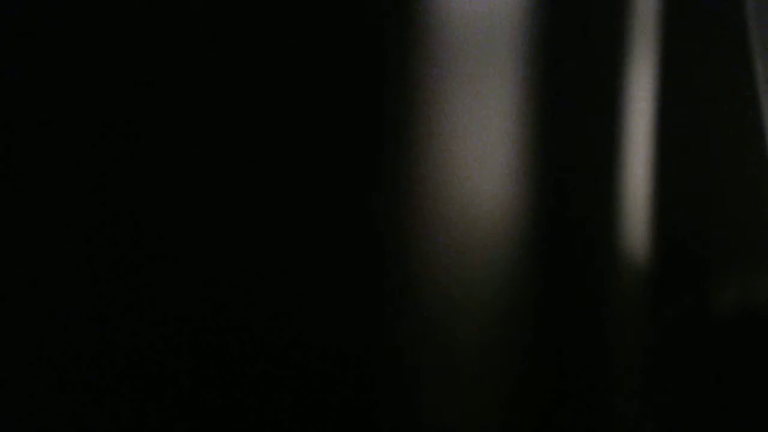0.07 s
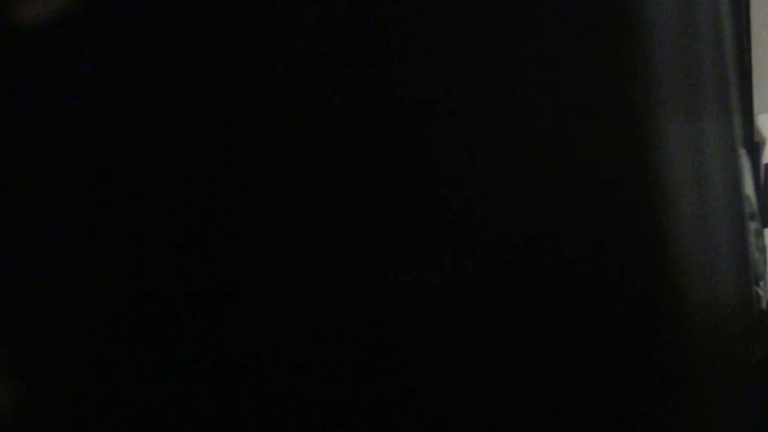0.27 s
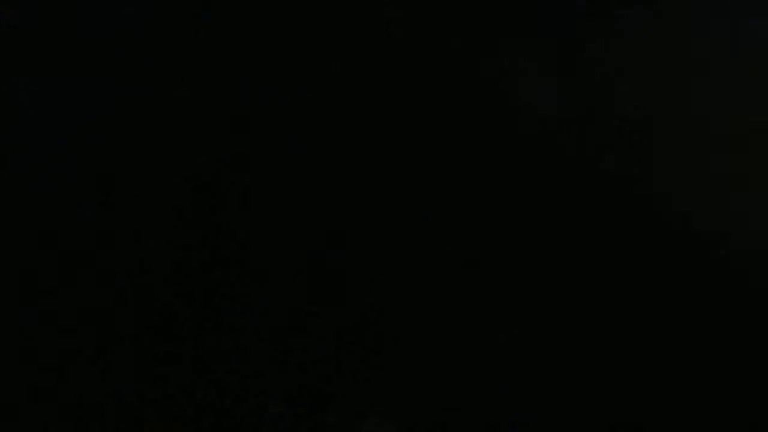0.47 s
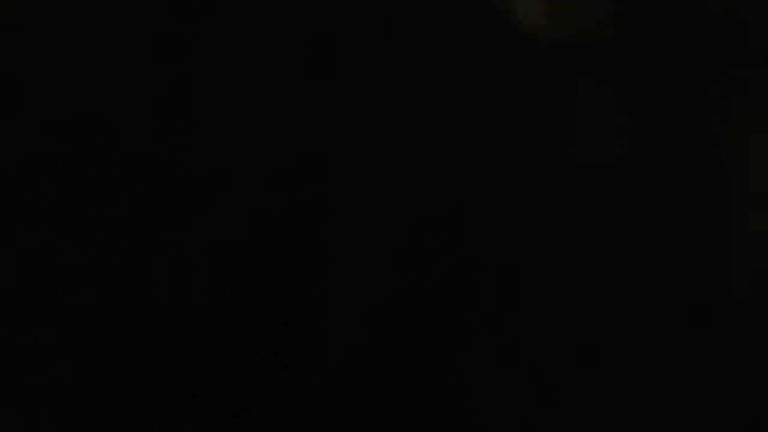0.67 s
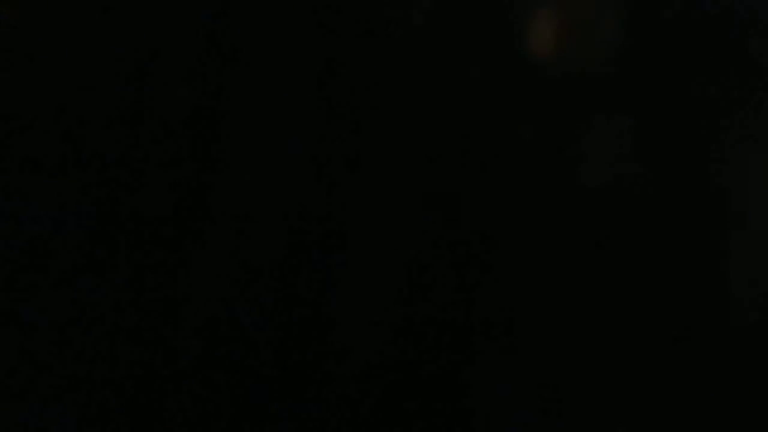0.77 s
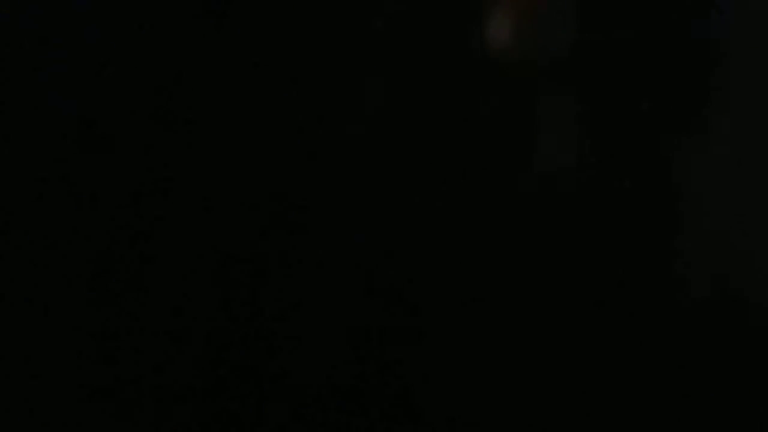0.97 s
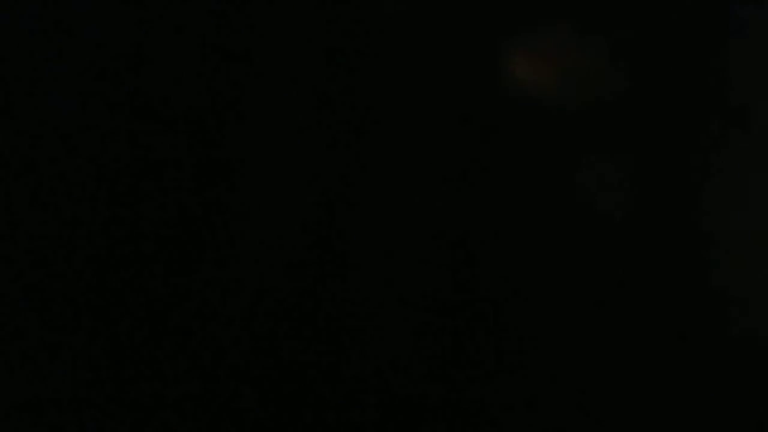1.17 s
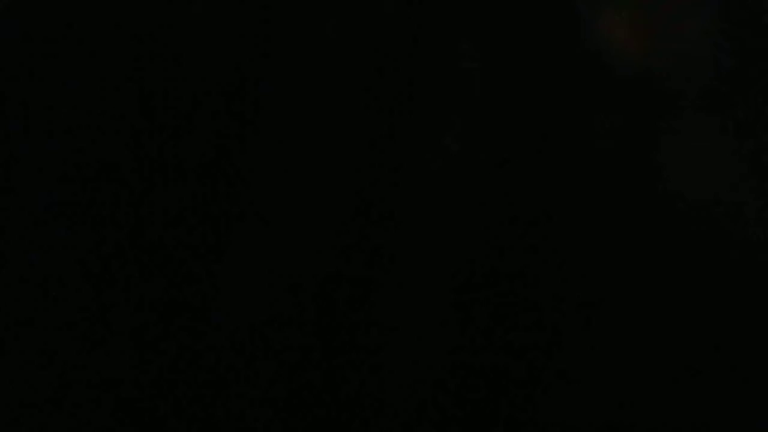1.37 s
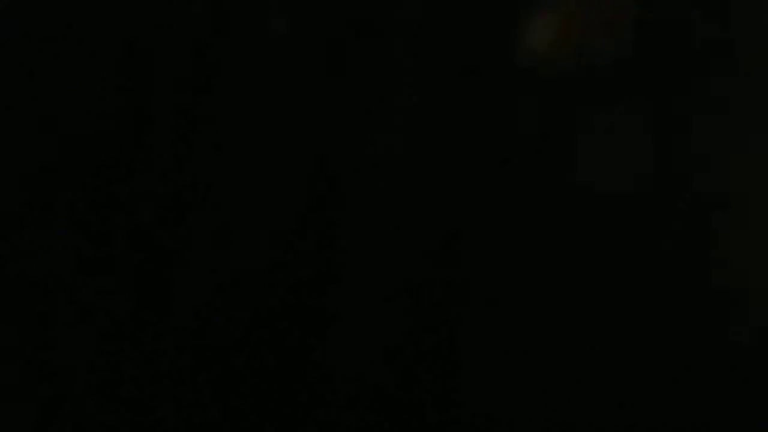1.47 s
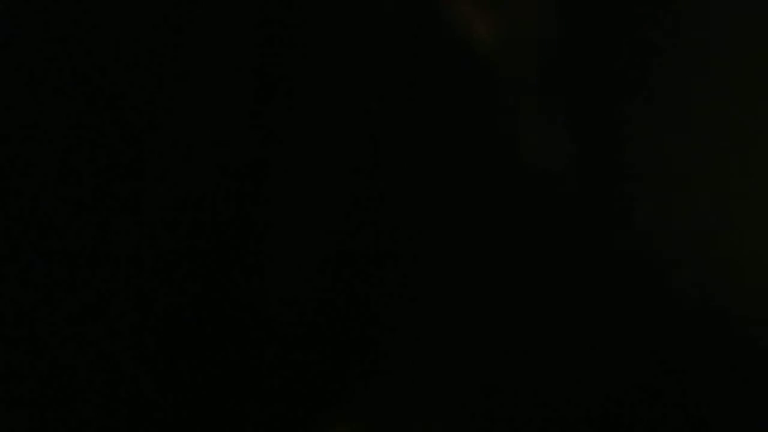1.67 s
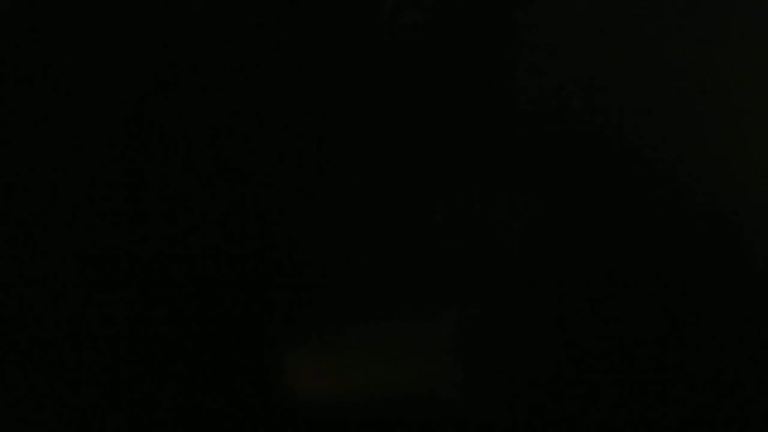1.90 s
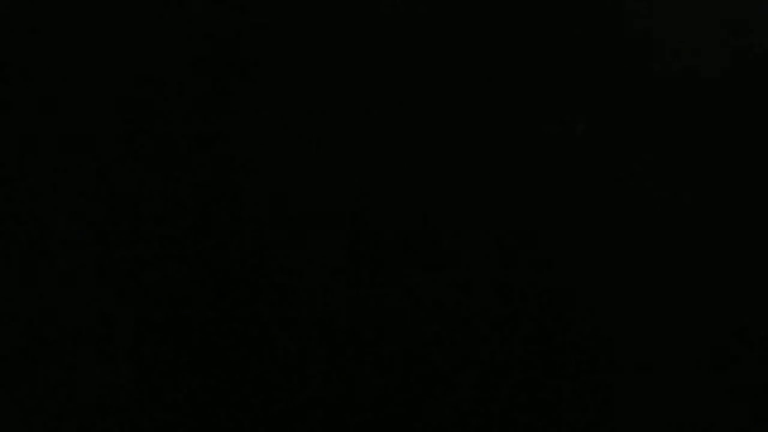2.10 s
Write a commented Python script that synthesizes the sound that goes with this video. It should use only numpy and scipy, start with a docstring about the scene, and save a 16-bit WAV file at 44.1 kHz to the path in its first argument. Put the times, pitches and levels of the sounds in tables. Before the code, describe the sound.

A book is forced into a tightly packed wooden shelf, heard close up for about two seconds. From the start to 0.5 seconds, covers rub in short shoves with several hollow knocks and a light paper rustle. Around 0.6 to 0.9 seconds the rubbing turns into a stuttering creak with small ticks. A sharp, loud knock at about 1.05 seconds rings the shelf briefly, followed by more creaks and taps. After a lull near 1.5 seconds, scraping and rustling build from 1.6 seconds and end in a quick cluster of loud knocks at about 2 seconds, with page edges brushing past just afterwards. Throughout, the hand holding the camera adds a low rumble and dull bumps, stronger near 1.25 seconds and heaviest from 1.8 seconds on. The small room gives only a faint, dull echo.

```python
"""A book knocks against its neighbours as it is forced into a tightly packed wooden shelf.
The covers rub, stick and slip; their knocks and creaks set the shelf ringing.
Paper rustles and page edges brush past, with a faint echo from a small room.
Close by, the hand holding a camera adds dull bumps and a low rumble."""
import sys
import numpy as np
from scipy import signal
from scipy.fft import rfft, irfft, next_fast_len
from scipy.io import wavfile
from scipy.ndimage import uniform_filter1d

SR = 44100
rng = np.random.default_rng(int(sys.argv[2]) if len(sys.argv) > 2 else 0)


def output_pcm(signal):
    """Save a mono or channel-first signal as 16-bit PCM at the path in sys.argv[1].

    Samples are clipped to [-1, 1] before scaling.
    """
    pcm = np.clip(np.atleast_2d(signal).T, -1, 1) * 32767
    wavfile.write(sys.argv[1], SR, np.round(pcm).astype(np.int16))


N = 94374
TIME = np.arange(N) / SR

# Levels in the tables are relative: the functions add their own gains.
# pushes on the book: start/s, length/s, rub/dB, creak/dB, rustle/dB, hiss/dB
SHOVES = [(0.005, 0.16, -42, -49, -57, -86), (0.195, .14, -38.5, -47, -56, -74),
          (0.372, .19, -57, -41.5, -58, -74.5), (0.619, 0.13, -45, -38.5, -59, -73),
          (0.744, 0.087, -59, -35.5, -67, -88), (0.894, 0.049, -47.5, -57.5, -59, -82),
          (1.126, 0.053, -48.5, -36.5, -60.5, -77), (1.18, 0.14, -47.5, -44.5, -60, -69.5),
          (1.318, 0.13, -51.5, -43.5, -67, -72), (1.505, 0.18, -74, -69, -66.5, -72.5),
          (1.616, 0.13, -43.5, -48, -49.5, -63), (1.698, 0.063, -39.5, -41.5, -47.5, -65.5),
          (1.819, 0.098, -37.5, -38, -47.5, -60.5), (1.946, 0.14, -40.5, -35, -49.5, -65)]
# the book's slow, steady creep, heard between pushes: rub/dB, creak/dB, rustle/dB, hiss/dB
CREEP_LEVELS = (-56.5, -56.5, -65, -79.5)
# tone of covers gliding, covers creaking, paper rustling and paper hissing: f/Hz, level/dB
RUB_SPECTRUM = [(230, -13), (320, 10), (520, 4), (700, 6), (950, 3.5), (1100, -25.5), (1500, -19)]
CREAK_SPECTRUM = [(230, -28), (330, 5.5), (450, -2.5), (580, 0.5), (800, -22), (1020, -5), (1190, -15.5),
                  (1400, -13), (1550, -30.5)]
RUSTLE_SPECTRUM = [(1100, 5.5), (1800, 1), (2500, 0), (3100, -7), (3500, -5.5), (3900, -48.5),
                   (5500, -30.5)]
HISS_SPECTRUM = [(3900, 3.5), (5100, -2), (6000, 4), (7000, 9.5), (7900, 8), (8500, -9.5)]
# notes at which the shelf rings: f/Hz, level/dB, time to fade by 60 dB/s
SHELF_MODES = [(196, -11, .09), (335, -2, .11), (370, -4, .11), (455, -12, .05), (528, 1, .09),
               (622, -5, .075), (940, -1, .07), (1055, -12, .06), (1385, -9, .04), (1675, -14, .08),
               (2040, -10, .08), (2450, -14, .05), (3480, -6, .07), (3740, -3, .02)]
# how restless the hand on the camera is: t/s, level/dB
GRIP_LEVELS = [(0.0, -41), (0.68, -39), (0.86, -42), (1.12, -38.5), (1.28, -34.5), (1.48, -43), (1.73, -41),
               (1.91, -29.5), (2.14, -35)]
# tone of the hand swaying and of the hand rubbing: f/Hz, level/dB
SWAY_SPECTRUM = [(7.1, -29), (12, 2.5), (33, 9), (46, -20.5), (70, -18), (91, -3), (150, -120)]
HAND_RUB_SPECTRUM = [(35, -30.5), (60, 10), (75, -10.5), (129, 2), (226, -14.5), (280, -8.5), (360, -36.5),
                     (620, -120)]
# the hand jolts the camera: t/s, thud level/dB, thud f/Hz, rocking level/dB
CAMERA_JOLTS = [(0.008, -26.5, 207, -54), (0.034, -21, 121, -27.5), (0.297, -25.5, 158.5, -24),
                (0.474, -25, 122, -25), (0.663, -21.5, 129, -31), (0.75, -29, 111, -20.5),
                (0.818, -34.5, 73, -30.5), (1.24, -22.5, 124.5, -16), (1.282, -24.5, 129, -26),
                (1.34, -26, 104.2, -24), (1.43, -20.5, 137.4, -29.5), (1.436, -29.5, 291, -42),
                (1.647, -28, 163.4, -21), (1.768, -21.5, 111, -16.5), (1.871, -25, 113, -14),
                (1.961, -20.5, 82, -16.5), (2.012, -10.5, 171.7, -15), (2.041, -14, 109, -14.5)]
# a cover hits its neighbour: t/s, level/dB, f/Hz, then (added to level) clatter/dB, crack/dB, snap/dB
COVER_KNOCKS = [(0.0083, -20, 510, -13.5, -34, -67), (0.0209, -26.5, 390, -10, -15, -22.5),
                (0.0431, -17, 514, -6.5, -17.5, -49), (0.1008, -21, 651, -6, -17, -46),
                (0.1062, -21, 335, -15, -34, -48), (0.3023, -31, 504, 0.5, -18.5, -55),
                (0.3678, -26, 315, -9.5, -28, -58.5), (0.4594, -27.5, 473, -6.5, -38, -52.5),
                (0.47, -21.5, 1175, -5, -15, -61), (0.4783, -18, 525, -6.5, -27, -39.5),
                (0.5393, -36, 1320, 2, -23, -47), (0.6023, -38, 1320, -1.5, -28.5, -28),
                (0.673, -45, 1270, 9.5, -38.5, -43), (0.7148, -39, 1380, -2, -15, -39),
                (0.7606, -32.5, 1114, 0, -20, -60), (0.7783, -34, 980, -4, -38, -57),
                (0.8053, -32.5, 315, -23, -45, -66.5), (0.8813, -38, 573, -6.5, -14.5, -43),
                (0.9438, -36.5, 385, -13.5, -24, -36), (1.0041, -34.5, 405, -9, -50, -60),
                (1.0215, -40.5, 1100, 10, -34, -48), (1.049, -9.5, 1380, -17.5, -18.5, -51.5),
                (1.0507, -7, 1022, -9.5, -36.5, -39.5), (1.0603, -17.5, 534, -9.5, -35, -63.5),
                (1.1173, -23.5, 553, -10.5, -27.5, -64), (1.2431, -25, 301, -17, -28.5, -48),
                (1.2742, -37, 1080, -2, -19, -40), (1.2988, -26.5, 682, -12, -28.5, -52),
                (1.3461, -34, 550, -21, -29, -41), (1.54, -42.5, 580, -22, -16.5, -33),
                (1.6187, -31, 570, -25.5, -25.5, -37), (1.771, -30, 483, -5, -40, -55),
                (1.8573, -23, 564, -15, -24.5, -26), (1.8698, -18, 680, -6, -30.5, -45),
                (1.9013, -28, 570, -2, -23.5, -43), (1.997, -16.5, 308, -14.5, -34, -45),
                (2.0083, -20, 413, -4, -38, -47), (2.0178, -7.5, 258.5, -10.5, -26, -32.5),
                (2.0213, -10, 591, -13, -46, -52), (2.0453, -12.5, 1350, -7.5, -24, -56),
                (2.0498, -18, 977, -32, -47, -58)]
# tone of a cover edge's low clatter, brighter crack and high snap: f/Hz, level/dB
CLATTER_SPECTRUM = [(120, -36), (300, 0), (550, 8.5), (1000, 2), (1400, -12.5), (1800, -49.5)]
CRACK_SPECTRUM = [(1100, -17), (1700, 7), (2700, -2), (3700, -17.5), (4300, -35), (6000, -30)]
SNAP_SPECTRUM = [(3500, -20), (4800, 2.5), (6100, -6.5), (7300, 5.5), (8600, -3)]
# a page edge brushes past: t/s, level/dB, f/Hz, rise time/s
PAGE_SCUFFS = [(0.021, -51.5, 7150, 0.0067), (0.071, -51.5, 6800, 0.001), (0.296, -56, 7000, 0.0013),
               (0.319, -59, 6960, 0.001), (0.465, -39.5, 2700, 0.0065), (0.483, -59.5, 7220, 0.011),
               (0.614, -49.5, 2500, 0.0026), (0.62, -59.5, 3530, .012), (0.934, -60, 6780, 0.0006),
               (0.997, -47.5, 1750, 0.0024), (1.05, -29, 3800, 0.00086), (1.395, -58.5, 3240, 0.0082),
               (1.958, -41.5, 3160, 0.0013), (2.07, -35.5, 2700, 0.0014), (2.096, -38.5, 2620, 0.0013)]


def from_db(db):
    """Turn decibels into a number to multiply by."""
    return 10 ** (np.asarray(db) / 20)


def rms_one(x):
    """Scale a signal so that its average power is 1."""
    return x / np.sqrt(np.mean(x ** 2) + 1e-20)


def colour(x, spectrum):
    """Give a signal the tone of a spectrum table, falling away steeply beyond the table's ends."""
    size = next_fast_len(2 * N)
    octave = np.log2(np.maximum(np.arange(size // 2 + 1) * SR / size, 1))
    hz, db = np.transpose(spectrum)
    octaves_outside = np.abs(octave - np.clip(octave, np.log2(hz[0]), np.log2(hz[-1])))
    gain = from_db(np.interp(octave, np.log2(hz), db) - np.minimum(40 * octaves_outside, 80))
    # make the filter ring only after a click, never before it (minimum phase)
    cepstrum = irfft(np.log(rms_one(gain)), size)
    cepstrum[1:size // 2] *= 2
    cepstrum[size // 2 + 1:] = 0
    return irfft(rfft(x, size) * np.exp(rfft(cepstrum)), size)[:N]


def even(x, window_s):
    """Hold the power steady over a short window."""
    power = uniform_filter1d(x ** 2, max(int(window_s * SR), 2))
    return x / np.sqrt(np.abs(power) + 1e-12)


def noise(spectrum):
    """Smooth noise with the given tone."""
    return rms_one(colour(rng.standard_normal(N), spectrum))


def slips(per_s, spread_db):
    """Tiny slips: clicks of uneven size at random times."""
    sizes = from_db(spread_db * np.minimum(rng.exponential(1, N), 4)) * rng.choice([-1, 1], N)
    return sizes * (rng.random(N) < per_s / SR)


def swell(age, peak_s):
    """A curve that rises to 1 at peak_s after a contact, then dies away."""
    x = np.maximum(age, 0) / max(peak_s, 1e-4)
    return x * np.exp(1 - x)


def shove(start, length, attack_s=0.034, release_s=0.05, arch_db=0.5):
    """The pressure of one push comes on, is highest halfway through, and lets go."""
    age = TIME - start
    attack = np.clip(.5 + age / attack_s, 0, 1)
    release = np.clip(1 - (age - length) / release_s, 0, 1) ** 2
    from_middle = 2 * np.clip(age / length, 0, 1) - 1
    return attack * release * from_db(-arch_db * from_middle ** 2)


def sliding_book():
    """Covers glide, or stick and slip and shake the shelf; paper fibres add a rustle and a hiss."""
    power = sum(np.outer(from_db(levels), shove(start, length)) ** 2
                for start, length, *levels in SHOVES)
    rub_gain, creak_gain, rustle_gain, hiss_gain = np.sqrt(power + from_db(CREEP_LEVELS)[:, None] ** 2)
    rub = even(noise(RUB_SPECTRUM), window_s=0.016)
    stutter = colour(slips(per_s=830, spread_db=5), CREAK_SPECTRUM)
    creak = even(stutter + from_db(-1) * shelf_ring(stutter), window_s=0.032)
    fibres = colour(slips(per_s=4400, spread_db=3), RUSTLE_SPECTRUM)
    rustle = even(fibres, window_s=0.1)
    hiss = noise(HISS_SPECTRUM)
    return rub_gain * rub + creak_gain * creak + rustle_gain * rustle + hiss_gain * hiss


def shelf_ring(force):
    """The boards and the gaps between the books ring at their own notes when shaken."""
    out = np.zeros(N)
    for hz, db, fade_s in SHELF_MODES:
        decay = from_db(-60 / (fade_s * SR))   # share of the swing left after one sample
        feed = (1 - decay ** 2) / 2
        feedback = [1, -2 * decay * np.cos(2 * np.pi * hz / SR), decay ** 2]
        out += from_db(db) * signal.lfilter([feed, 0, -feed], feedback, force + 1e-18)
    return out


def room_echo(sound, fade_s, cutoff_hz):
    """A small furnished room answers with a dull tail that falls by 60 dB in fade_s."""
    tail = rng.standard_normal(N // 4) * from_db(-60 * TIME[:N // 4] / fade_s)
    tail /= np.sqrt(np.sum(tail ** 2))
    walls = signal.butter(2, cutoff_hz, fs=SR, output="sos")
    return signal.fftconvolve(sound, signal.sosfilt(walls, tail))[:N]


def hand_on_camera(rock_hz=28.6):
    """The camera body carries the hand's sway and rub to the microphone; jolts thud and rock it."""
    grip = from_db(np.interp(TIME, *np.transpose(GRIP_LEVELS)))
    sway = from_db(1) * even(noise(SWAY_SPECTRUM), window_s=0.033)
    rub = from_db(2) * even(noise(HAND_RUB_SPECTRUM), window_s=0.025)
    out = grip * (sway + rub)
    for start, thud_db, thud_hz, rock_db in CAMERA_JOLTS:
        age = TIME - start
        out += from_db(thud_db - 2) * swell(age, peak_s=0.0082) * np.sin(2 * np.pi * thud_hz * age)
        out += from_db(rock_db) * swell(age, peak_s=0.017) * np.sin(2 * np.pi * rock_hz * age)
    return out


def cover_knocks(cardboard_cutoff_hz=1395, damping_db_per_db=0.15, usual_knock_db=-30.5):
    """A struck cover swings briefly; its edge clatters, cracks and snaps, and the shelf answers."""
    clatter = even(noise(CLATTER_SPECTRUM), window_s=0.0027)
    crack = even(noise(CRACK_SPECTRUM), window_s=0.00058)
    snap = even(noise(SNAP_SPECTRUM), window_s=0.0021)
    cardboard = signal.butter(6, cardboard_cutoff_hz, fs=SR, output="sos")
    direct, into_shelf = np.zeros(N), np.zeros(N)
    for start, level_db, hz, clatter_db, crack_db, snap_db in COVER_KNOCKS:
        span = slice(int(start * SR), int(start * SR) + SR // 16)
        age = TIME[span] - start
        swing = swell(age, peak_s=0.0015) * np.sin(2 * np.pi * hz * age)
        blow = from_db(1.5) * signal.sosfilt(cardboard, swing)   # soft cardboard swings without treble
        # the higher the sound, the sooner it dies in the paper
        blow += from_db(clatter_db) * swell(age, peak_s=0.0028) * clatter[span]
        blow += from_db(crack_db + 1) * swell(age, peak_s=0.0024) * crack[span]
        blow += from_db(snap_db + 1) * swell(age, peak_s=0.00063) * snap[span]
        direct[span] += from_db(level_db) * blow
        # the sharp push of the contact reaches every note of the shelf
        thrust = from_db(-3) * swell(age, peak_s=0.0001)
        # a harder knock presses the book against the boards and damps them
        ring_db = 4 - damping_db_per_db * (level_db - usual_knock_db)
        into_shelf[span] += from_db(level_db + ring_db) * (blow + thrust)
    return direct + shelf_ring(into_shelf)


def page_scuffs(width_octaves=0.25):
    """A page edge brushes past: a short burst of dense, tiny slips."""
    out = np.zeros(N)
    fibres = slips(per_s=4000, spread_db=2)
    for start, level_db, hz, rise_s in PAGE_SCUFFS:
        edges_hz = hz * 2 ** (np.array([-.5, .5]) * width_octaves)
        band = signal.butter(2, edges_hz, "band", fs=SR, output="sos")
        rasp = rms_one(signal.sosfilt(band, fibres))
        out += from_db(level_db - 4) * swell(TIME - start, rise_s) * rasp
    return out


def scene():
    """Books close by, a faint room echo and the hand on the camera, in one channel."""
    books = cover_knocks() + sliding_book() + page_scuffs()
    echo = from_db(-18.5) * room_echo(books, fade_s=0.46, cutoff_hz=3450)
    return (books + echo + hand_on_camera())[None]


def record(dry, ceiling=0.72, cutoff_hz=8600):
    """Any peak above the ceiling is flattened, then the high treble is cut."""
    treble_cut = signal.ellip(10, .3, 80, cutoff_hz, fs=SR, output="sos")
    return signal.sosfilt(treble_cut, np.clip(dry, -ceiling, ceiling))


dry = scene()
out = record(dry)
output_pcm(out)
```